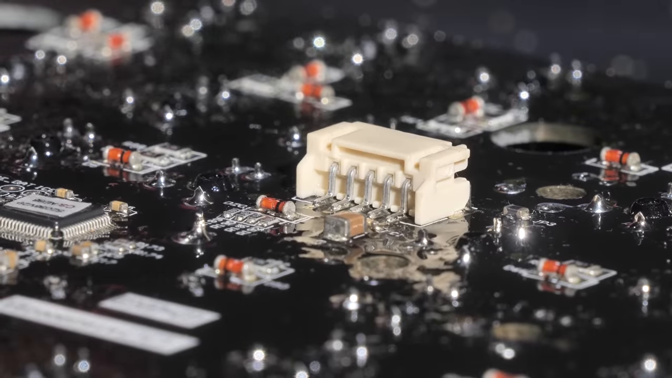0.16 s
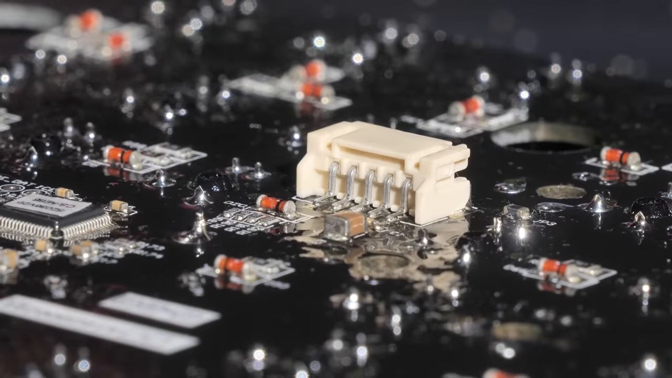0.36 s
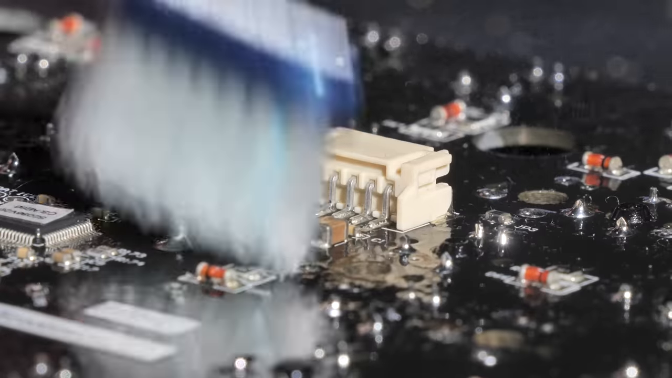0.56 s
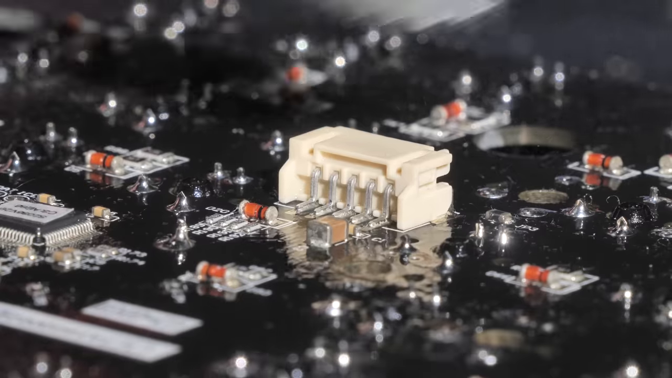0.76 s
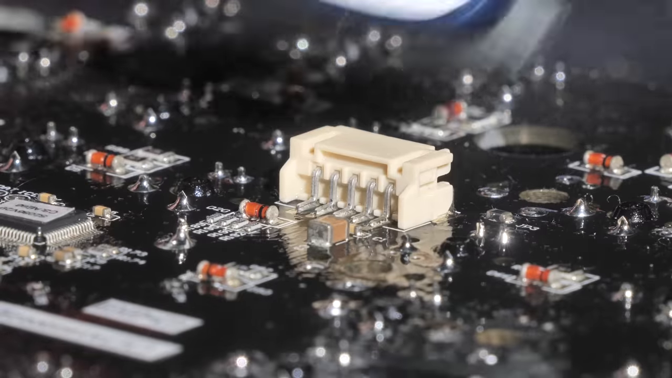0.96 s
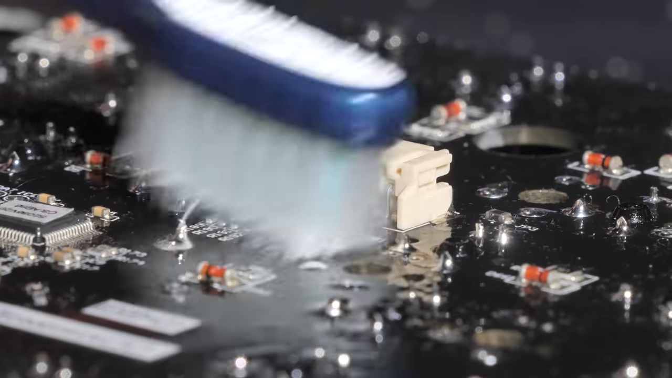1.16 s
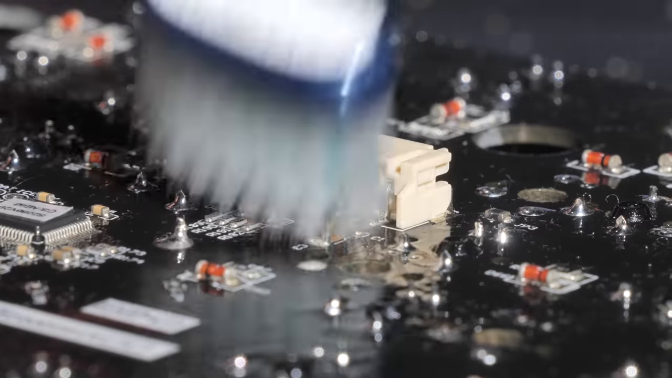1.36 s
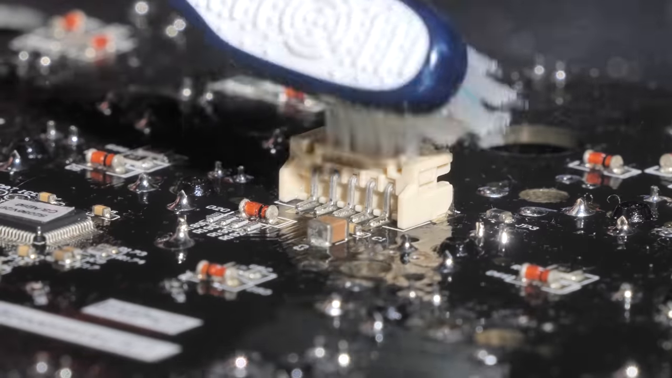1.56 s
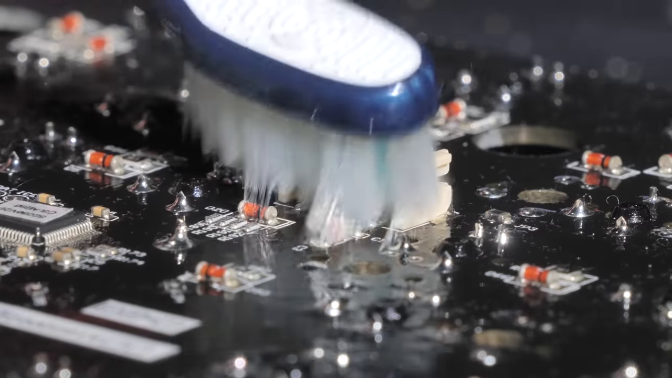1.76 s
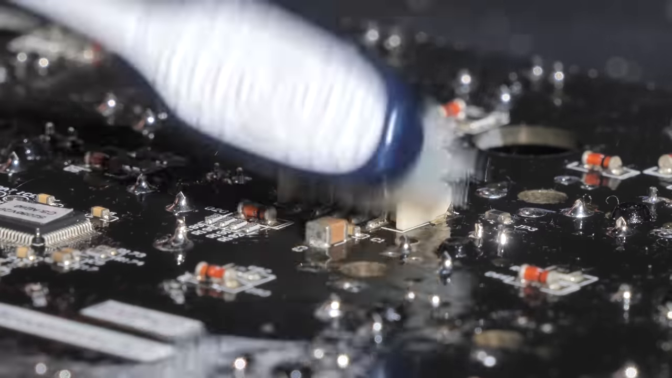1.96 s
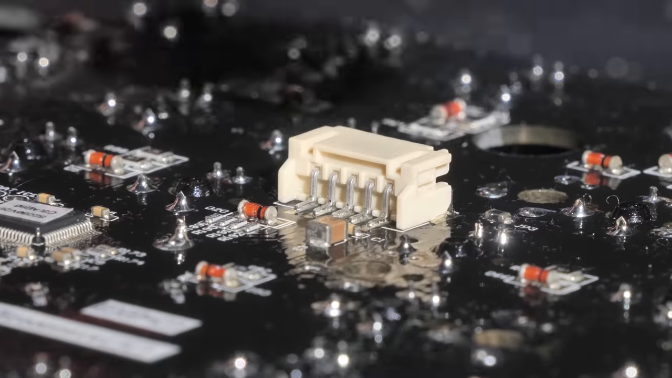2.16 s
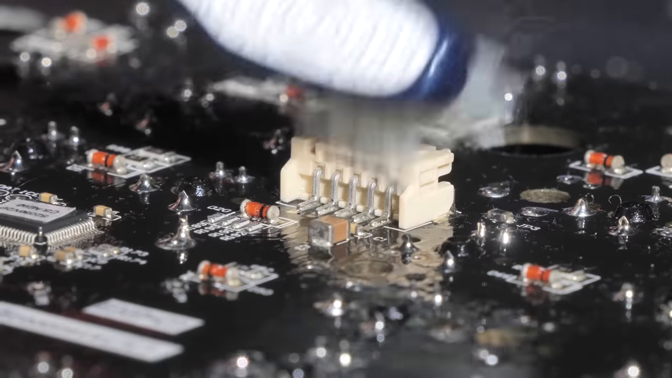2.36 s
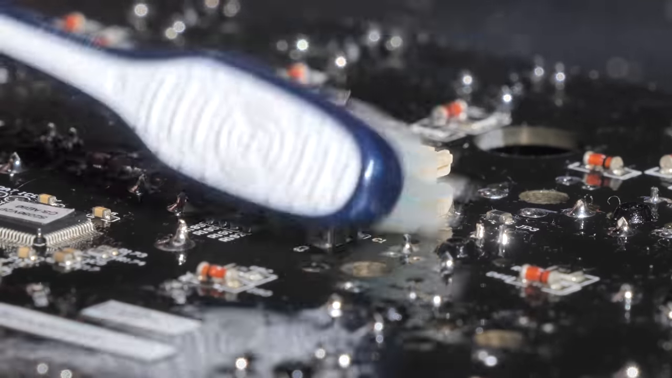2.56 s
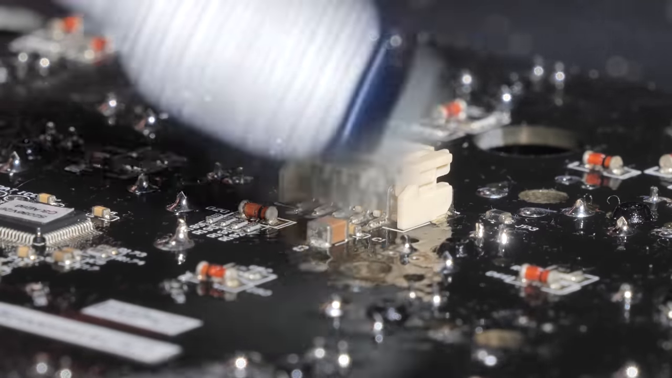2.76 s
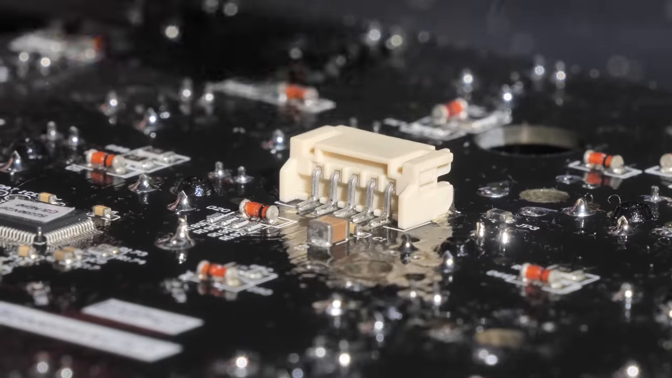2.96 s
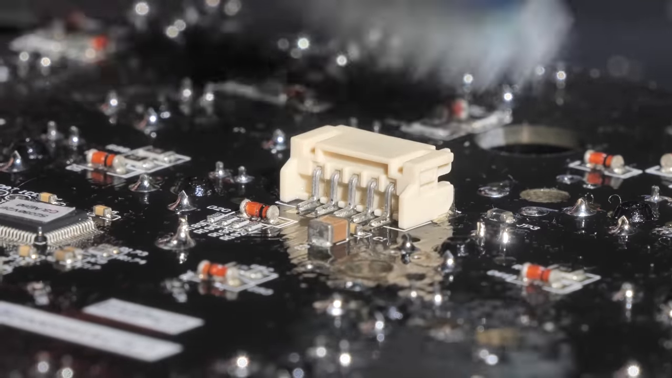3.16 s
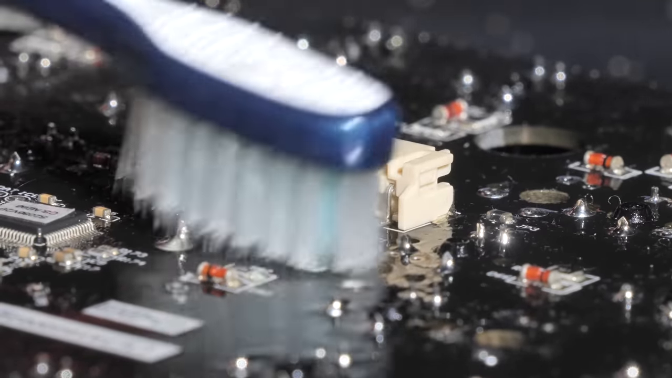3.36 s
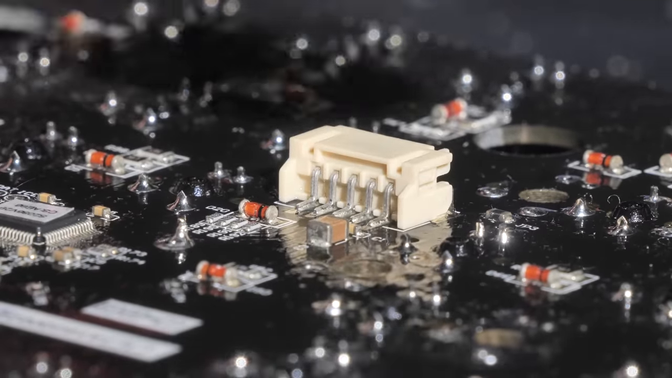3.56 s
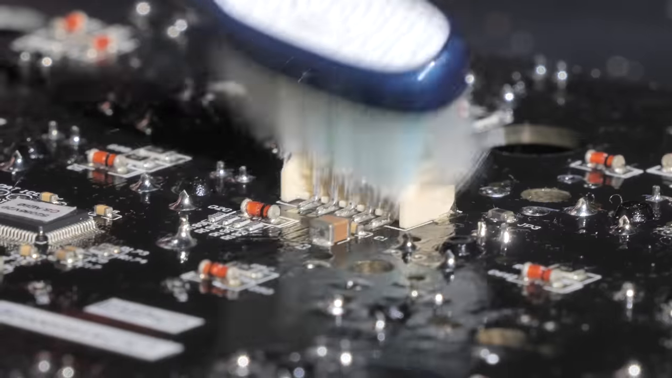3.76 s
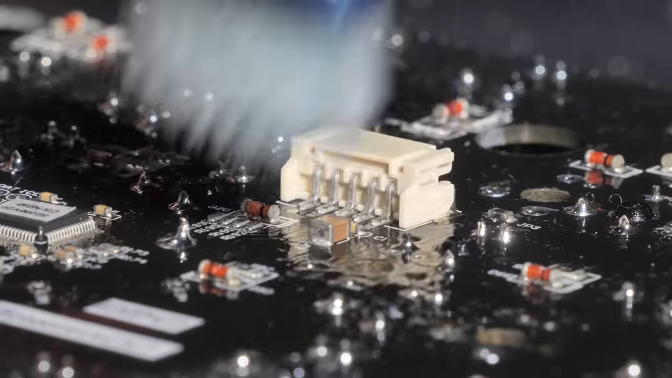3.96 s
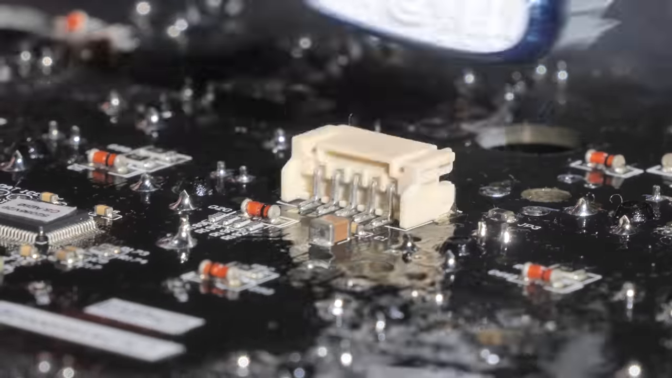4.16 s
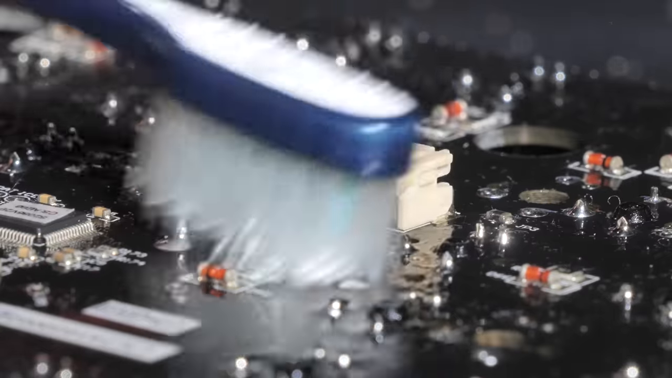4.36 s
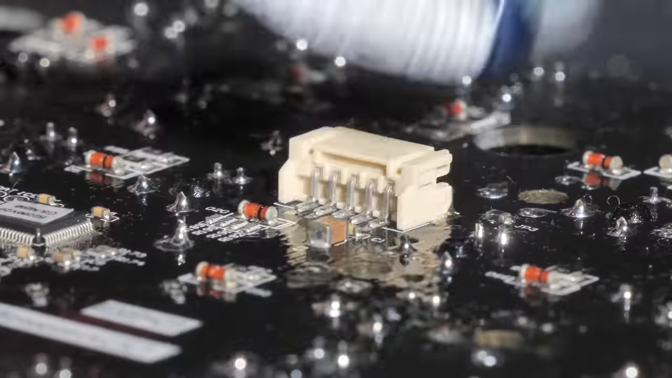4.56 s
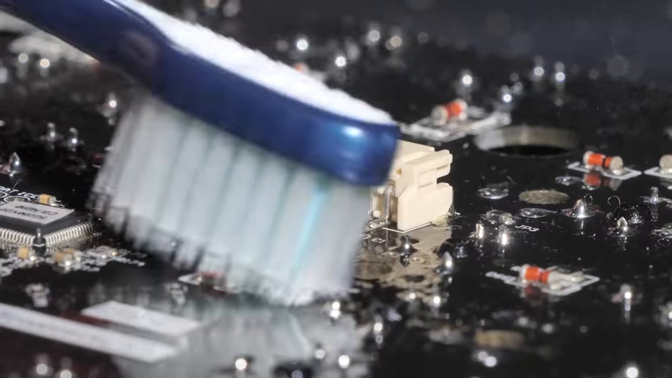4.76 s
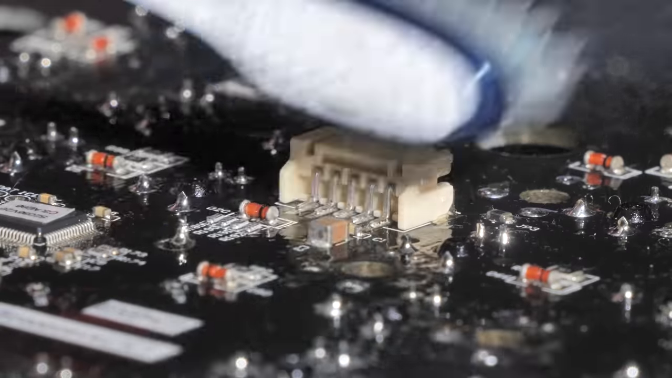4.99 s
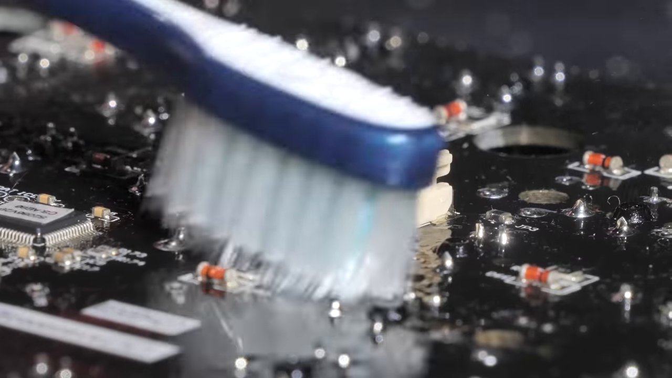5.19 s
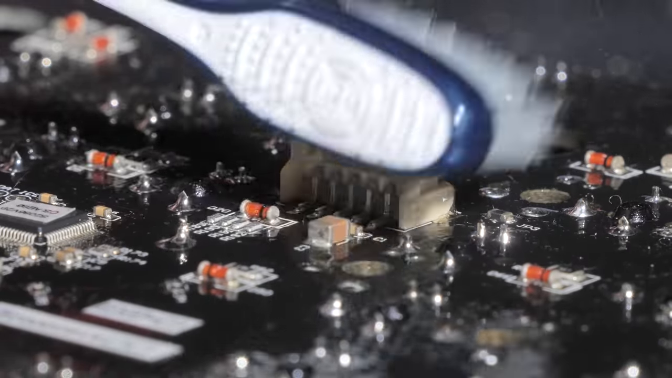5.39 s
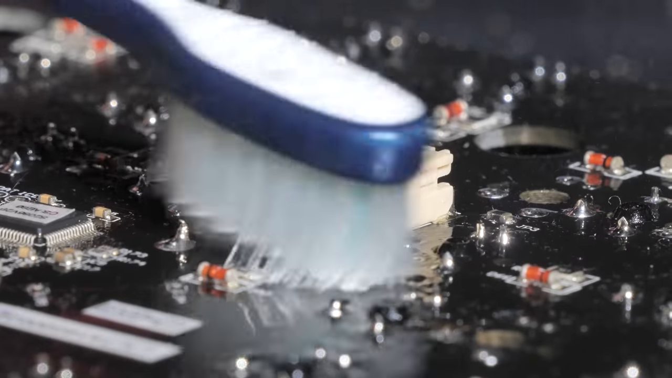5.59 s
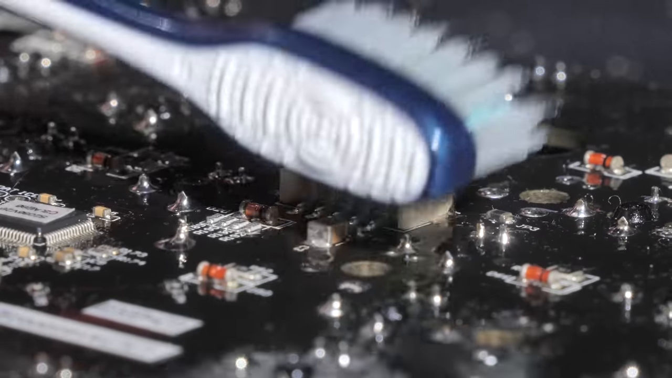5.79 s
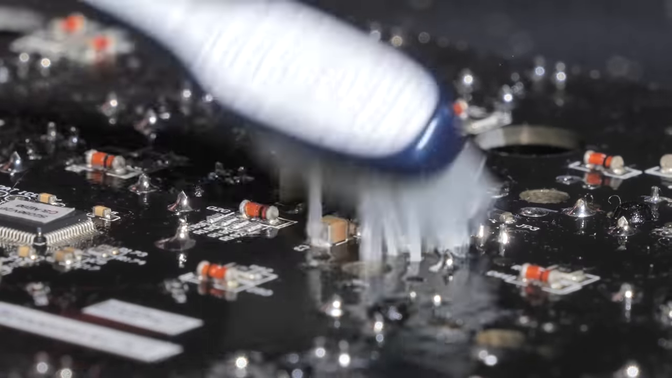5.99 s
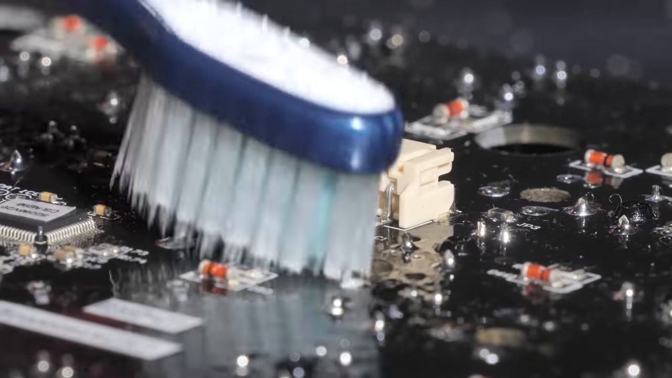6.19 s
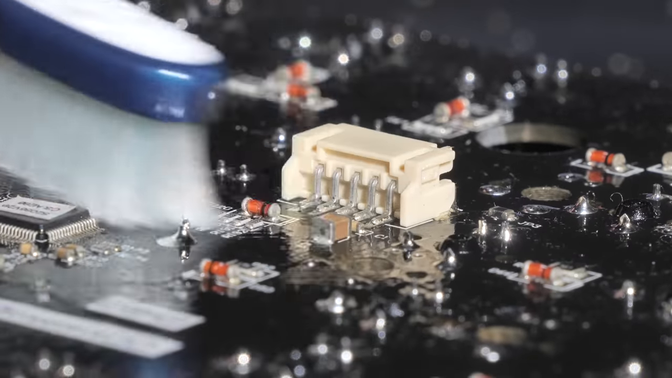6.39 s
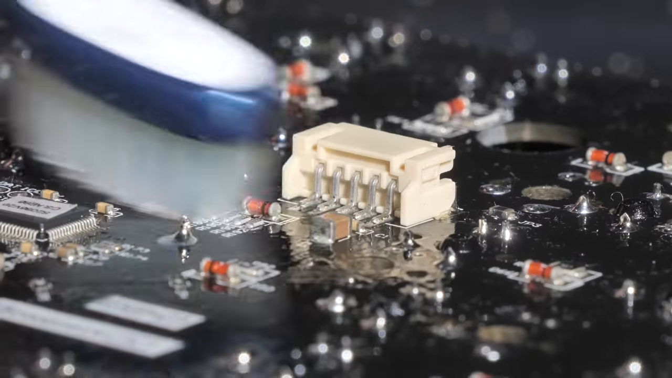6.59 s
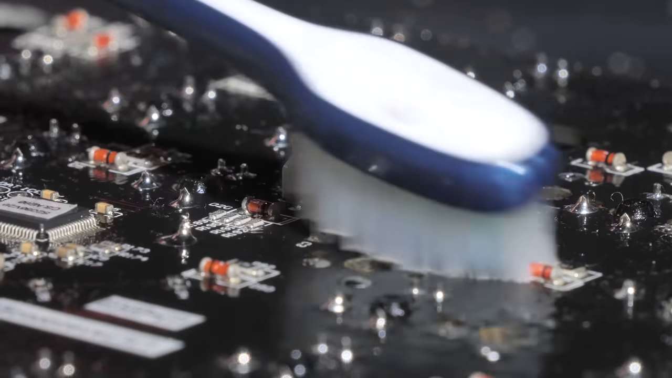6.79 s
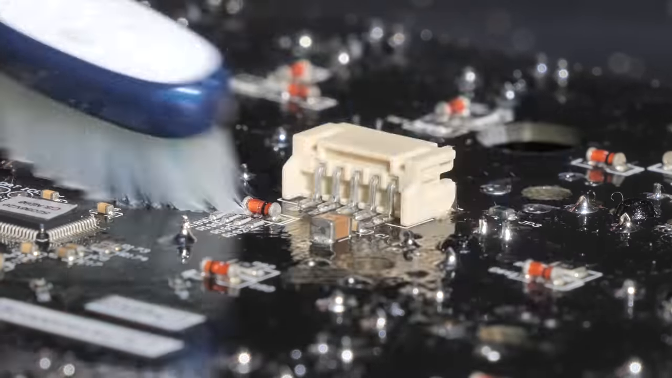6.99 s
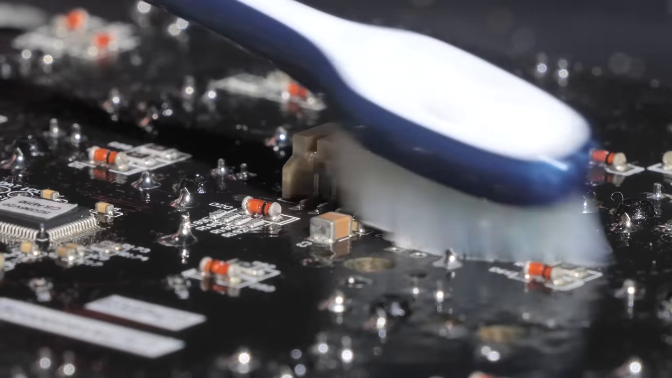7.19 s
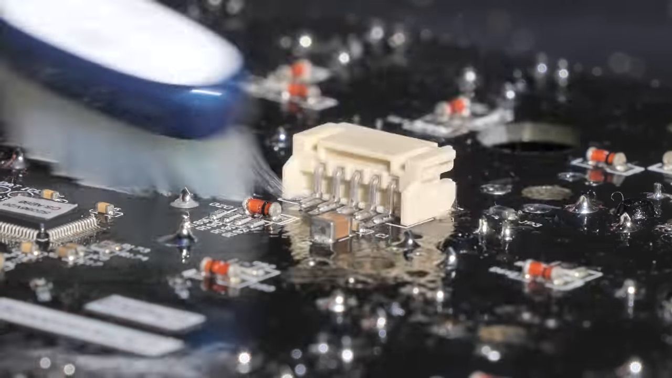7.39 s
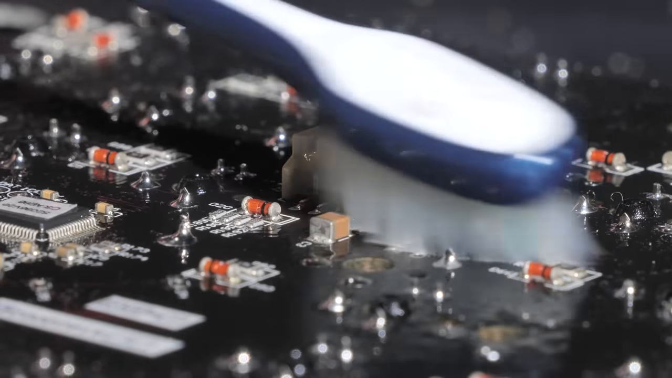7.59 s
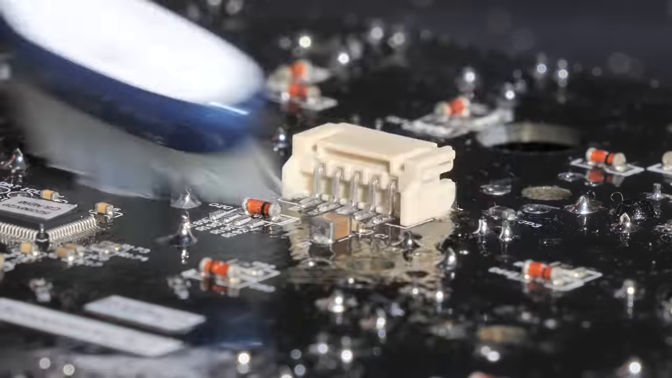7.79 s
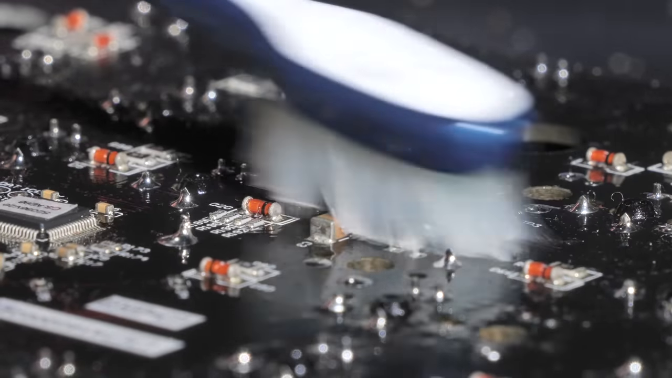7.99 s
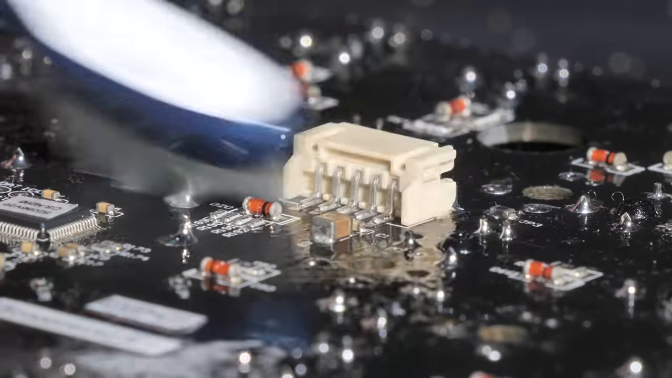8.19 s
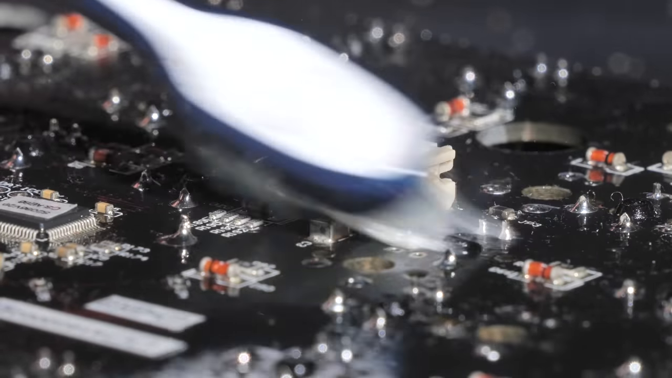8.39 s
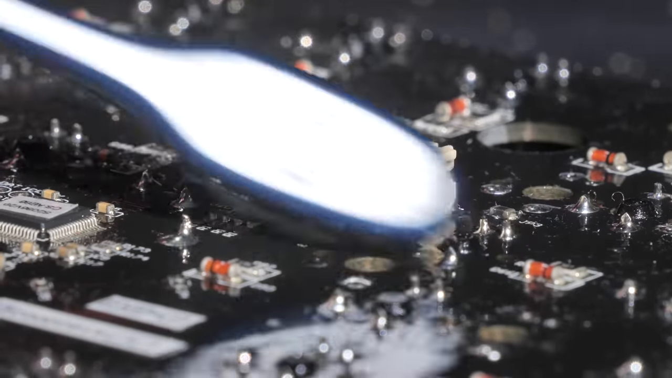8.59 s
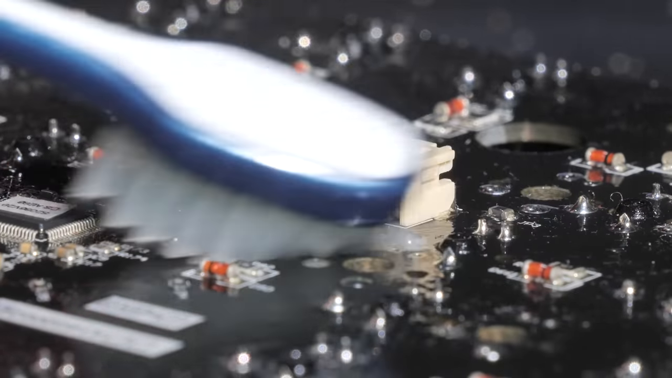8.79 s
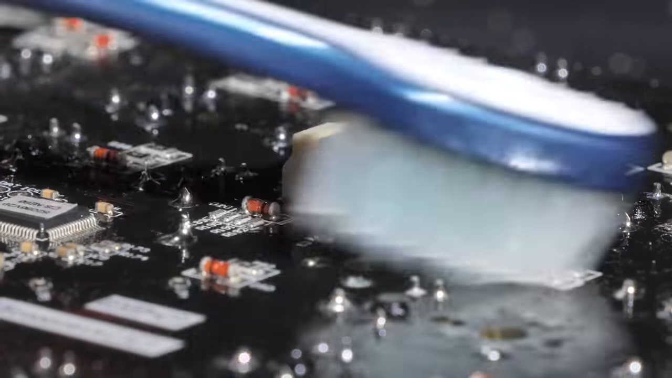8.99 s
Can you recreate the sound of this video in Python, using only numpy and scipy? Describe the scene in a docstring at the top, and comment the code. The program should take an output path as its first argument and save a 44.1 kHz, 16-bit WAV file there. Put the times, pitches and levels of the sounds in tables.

```python
"""A toothbrush cleans a wet circuit board close by, in a small, quiet room.
For six seconds it dabs: the tufts land, drag over solder pins and snap free, with dull bumps on the bench.
Countless bristle flicks hiss, ring the board and rumble its support; early on, the board rattles briefly.
Then the brush scrubs steadily to and fro, its finer hiss rising and falling with the hand's swing.
Near the end the board knocks sharply against its support and rattles, and the scrubbing eases off."""
import sys
import numpy as np
from scipy import signal
from scipy.fft import rfft, irfft
from scipy.io import wavfile

SR = 44100
rng = np.random.default_rng(int(sys.argv[2]) if len(sys.argv) > 2 else 0)


def master(y):
    """Save y as 16-bit WAV."""
    cut = np.clip(np.atleast_2d(y).T, -1, 1)
    pcm = np.round(cut * 32767)  # scale
    wavfile.write(sys.argv[1], SR, pcm.astype(np.int16))


N = 399105
T = np.arange(N) / SR
GRID_HZ = np.maximum(np.arange(4097) * SR / 8192, 1)


# EQ of bristles flicking off pins: freq_hz, gain_db
FLICK_EQ = [(150, -48.5), (600, -13.5), (1100, -13), (2100, -14), (2500, -10), (3700, -2.5), (4700, -8),
            (5300, -2), (5900, -13), (6400, -7), (7400, -1), (9000, -4), (11000, -2.5), (12600, -1.5),
            (14300, -9.5), (15500, -5.5)]
# Drags of the brush (a long dab is a push and a pull): start_s, end_s, halfway_hiss_db, swell_db,
# board_db, support_db, board_pitch_hz, support_pitch_hz, brightness_db_per_octave
BRUSH_DRAGS = [ (0, 0.137, -72, -12, -90, -90, 1600, 240, 0),
               (0.279, 0.375, -61.5, -17, -96, -59.5, 1790, 300, -8.5),
               (0.371, 0.504, -68.5, 16, -77, -70, 1630, 240, 0.5),
               (0.645, 0.759, -50.5, 16.5, -59.5, -57.5, 1370, 164, .5),
               (0.908, 1.037, -48.5, 23, -57.5, -56.5, 1600, 246, -.5),
               (1.204, 1.312, -46, 22, -53, -54, 1540, 209, -0.5),
               (1.45, 1.575, -48.5, 14.5, -58.5, -55, 1500, 352, -0.5),
               (1.571, 1.663, -44.5, -9, -64.5, -66, 1570, 165, 3),
               (1.751, 1.797, -58.5, 8, -65, -68, 1580, 150, -2),
               (1.792, 1.884, -44.5, 4, -55.5, -55.5, 1550, 360, -0.5),
               (2.07, 2.155, -38.5, -1, -61, -59.5, 1480, 140, 3),
               (2.325, 2.461, -43.5, 10.5, -56, -61, 1450, 372, 0),
               (2.626, 2.714, -39, 12.5, -58.5, -58, 1580, 163.5, 2),
               (2.86, 2.957, -44, 23.5, -57, -55.5, 1520, 178, 1.5),
               (3.146, 3.179, -59, 8, -67, -70, 1520, 172, -1),
               (3.175, 3.23, -41.5, 18.5, -60.5, -59.5, 1570, 169, 2.5),
               (3.408, 3.535, -46.5, 14.5, -56, -58, 1530, 183, 0.5),
               (3.741, 3.906, -42, 14.5, -54, -53.5, 1600, 169, 0.5),
               (4.087, 4.239, -42, 15, -56.5, -50, 1610, 170, -0.5),
               (4.398, 4.532, -45, 16, -55, -58.5, 1600, 263, -.5),
               (4.527, 4.632, -41.5, 14, -59.5, -61, 1510, 366, 1.5),
               (4.823, 4.978, -48, 14, -57.5, -60, 1650, 169, 0.5),
               (4.967, 5.084, -42, 11, -59.5, -57, 1570, 166, 1.5),
               (5.247, 5.38, -46, 7.5, -57, -58, 1610, 364, -0.5),
               (5.371, 5.506, -42.5, 4, -61, -60.5, 1530, 207, 2),
               (5.662, 5.812, -43.5, -2.5, -54.5, -52, 1600, 210, -1.5),
               (5.808, 5.892, -47, 6.5, -69.5, -69, 1590, 210, 2),
               (6.018, 6.048, -61, 16, -72, -63, 1550, 181, 5),
               (6.048, 6.203, -50.5, -22, -67, -69, 1540, 357, 1),
               (6.255, 6.309, -58.5, -8, -61.5, -68, 1630, 265, -6), ]

def dabbing(attack_s=0.0098, release_s=0.0049, board_share=0.86, board_sag_db=13, support_sag_db=8):
    """Bristles drag over pins and a connector: a coarse crackle that mostly swells as they bend."""
    force = bristle_slips(rate_hz=9000, scatter_db=1.5, tuft_rate_hz=380, tuft_db=3.5)
    force *= undb(1.43 * wander(90))
    out = np.zeros(N)
    for start, end, hiss_db, swell_db, board_db, support_db, *timbre in BRUSH_DRAGS:
        done = progress(start, end)
        touch = np.clip((end - start) * np.minimum(done / attack_s, (1 - done) / release_s), 0, 1)
        # board and support follow the swell, but sag as the brush slows
        slopes_db = swell_db, board_share * swell_db - board_sag_db, swell_db - support_sag_db
        envelopes = [touch * undb(mid_db + slope_db * (done - .5))
                     for mid_db, slope_db in zip((hiss_db, board_db, support_db), slopes_db)]
        out += stroke(force, start, envelopes, timbre, FLICK_EQ)
    return out


# EQ of bristles sliding on the wet board: freq_hz, gain_db
SLIDE_EQ = [(150, -29), (600, -16), (1100, -13), (2100, -26.5), (2500, -9.5), (3700, -4.5), (4700, -6),
            (5250, 0.5), (5800, -7), (6400, -5.5), (7400, 1), (9000, -2.5), (11000, -1), (12600, -3),
            (14200, -8), (15500, -6)]
# Scrub strokes, turn to turn, with levels at full speed: start_s, end_s, hiss_db, fastest_at_fraction,
# board_db, support_db, board_pitch_hz, support_pitch_hz, brightness_db_per_octave
SCRUB_STROKES = [ (6.299, 6.616, -47.5, 0.46, -50.5, -60.5, 1590, 277, -3.1),
                 (6.542, 6.853, -48, 0.66, -57, -60, 1540, 202, -1),
                 (6.857, 7.061, -38, 0.59, -44.5, -52, 1620, 247, -1.3),
                 (7.047, 7.26, -39.5, 0.54, -51, -51.5, 1590, 204, -1),
                 (7.261, 7.456, -34, 0.47, -47, -53, 1550, 253, -0.1),
                 (7.452, 7.653, -37.5, 0.56, -50.5, -49, 1540, 197, 0.2),
                 (7.652, 7.846, -33.5, 0.54, -46, -54, 1550, 261, 0.2),
                 (7.84, 8.036, -38, 0.52, -49.5, -53.5, 1570, 208, -0.2),
                 (8.031, 8.221, -33.5, 0.52, -43.5, -53, 1500, 274, 0),
                 (8.213, 8.403, -34.5, 0.66, -47.5, -46.5, 1540, 187, -0.2),
                 (8.402, 8.575, -33, 0.55, -47.5, -54.5, 1620, 248, 0),
                 (8.562, 8.791, -36.5, .52, -45.5, -50.5, 2000, 216, 0.2),
                 (8.781, 8.959, -43.5, 0.41, -50.5, -55, 1680, 234, -0.7),
                 (8.953, 9.062, -49, 0.37, -53, -65, 1790, 204, -0.5), ]

def scrubbing(glide=0.029, creep=0.12, speed_powers=(1.8, 1.68, 1.54)):
    """Bristles slide over the wet flat of the board: hiss, ring and rumble grow with the hand's speed."""
    force = bristle_slips(rate_hz=18000, scatter_db=5.5, tuft_rate_hz=490, tuft_db=2.0)
    out = np.zeros(N)
    for k, (start, end, hiss_db, fastest_at, board_db, support_db, *timbre) in enumerate(SCRUB_STROKES):
        swing = np.sin(np.interp(progress(start, end), [0, fastest_at, 1], [0, np.pi / 2, np.pi]))
        speed = creep + (1 - creep) * swing  # the brush still creeps at the turns
        envelopes = [undb(top_db) * speed ** power
                     for top_db, power in zip((hiss_db, board_db, support_db), speed_powers)]
        bend = glide if k % 2 else -glide  # the ring falls on a push, rises on a pull
        out += stroke(force, start, envelopes, timbre, SLIDE_EQ, bend, boost_db=9)
    return out


def bristle_slips(rate_hz, scatter_db, tuft_rate_hz, tuft_db):
    """Single bristles slip at random and bunch up as whole tufts catch and let go. Rms 1."""
    slips = (rng.random(N) < rate_hz / SR) * rng.choice([-1, 1], N)
    sizes = undb(scatter_db * np.clip(rng.standard_normal(N), -2, 2))
    bunching = undb(tuft_db * np.tanh(wander(tuft_rate_hz) / 2) * 2)
    force = slips * sizes * bunching
    return force / force.std()


# Hollow ring of the wet board flexing: pitch_hz, width_hz, level_db
BOARD_RING = [(850, 118, -14.5), (1265, 36, -5), (1456, 80, -2.5), (1639, 18, -1), (1725, 120, -3),
              (1923, 100, -3.5), (2297, 220, -6.5)]
# Low rumble of the board on its support: pitch_hz, width_hz, level_db
SUPPORT_RUMBLE = [(151, 33.6, -3.5), (186.6, 18.2, 2), (229.4, 18, -2.5), (302, 71, -5), (417.5, 48, -2),
                  (518, 22, -10)]

def stroke(force, start, envelopes, timbre, bristle_eq, glide=0, boost_db=7):
    """One contact: the same slips hiss in the bristles, ring the board and shake its support."""
    board_hz, support_hz, tilt_db = timbre
    tilted_eq = [(hz, db + tilt_db * np.log2(max(hz, 2000) / 8000)) for hz, db in bristle_eq]
    hiss = eq([(40, -84.5)] + tilted_eq)
    early_ring = resonator(BOARD_RING, board_hz * (1 - glide), boost_db, reach=0.14)
    late_ring = resonator(BOARD_RING, board_hz * (1 + glide), boost_db, reach=0.14)
    rumble = resonator(SUPPORT_RUMBLE, support_hz, boost_db=12.5, reach=0.14)
    slips = force[int(start * SR):][:len(envelopes[0])]
    on_bristles, on_board, on_support = (slips * envelope[:len(slips)] for envelope in envelopes)
    travel = np.sin(np.linspace(0, np.pi / 2, len(slips))) ** 2  # crossfades the ring as the brush moves
    out = np.zeros(N)
    for drive, response in [(on_bristles, hiss), (on_board * (1 - travel), early_ring),
                            (on_board * travel, late_ring), (on_support, rumble)]:
        add(out, start, signal.fftconvolve(drive, response))
    return out


# EQ of bristle tips hitting the board: freq_hz, gain_db
TIP_EQ = [(150, -28.5), (600, -21), (1500, -6.5), (2100, -11), (2600, 1), (4200, 0), (5300, 3),
          (6300, -2.5), (8000, 2), (11000, -2), (15700, -8)]
# Touchdowns of the brush: start_s, tick_db, ring_db, thud_db
TUFT_LANDINGS = [(.292, -48.5, -59, -49), (0.652, -50, -50, -54), (0.678, -41, -46, -46),
                 (.926, -46, -50, -44.5), (1.208, -42, -45, -47.5), (1.45, -43.5, -51, -57),
                 (2.031, -45.5, -70, -74), (2.047, -63, -66, -63), (2.07, -46, -66, -78),
                 (2.325, -43.5, -57, -73), (2.339, -45, -58, -54), (2.362, -61, -60, -46.5),
                 (2.595, -40, -54.5, -58), (2.599, -53, -54, -60), (3.127, -53, -78, -71),
                 (3.141, -44.5, -66, -60), (3.409, -40.5, -46.5, -42.5), (3.735, -40.5, -41, -49),
                 (4.08, -54, -48, -51), (4.087, -48, -44, -52), (4.398, -40, -45, -45.5),
                 (4.825, -41, -47, -52), (4.836, -47, -47.5, -58), (5.21, -46.5, -53, -50.5),
                 (5.636, -41.5, -49, -48.5), (5.996, -40.5, -45, -59), (6.036, -48, -64, -58),
                 (6.061, -35, -46.5, -49), (6.084, -35.5, -55, -59), (6.256, -48, -47.5, -58)]

def landing(lead_s=0.00056, gap_s=0.0073, hit_s=0.0046, settle_s=0.035, thud_s=0.029):
    """Four tufts hit in quick succession, each softer: ticks and a hollow ring over one soft thud."""
    tips, board, support = np.zeros((3, N))
    t = T[:SR // 10]
    for start, tick_db, ring_db, thud_db in TUFT_LANDINGS:
        gaps = gap_s * (rng.random(4) + .5)
        for k, delay in enumerate(np.cumsum(gaps) - gaps[0]):
            hit = flurry(np.exp(-t / hit_s)) * undb(-6 * np.sqrt(k))
            add(tips, start - lead_s + delay, undb(tick_db - 1.5) * hit)
            add(board, start - lead_s + delay, undb(ring_db + 1) * hit)
        rustle = rng.standard_normal(len(t)) * np.exp(-t / settle_s)  # the landed bristles spread
        add(tips, start, undb(tick_db - 23.5) * rustle)
        add(support, start, undb(thud_db + 5) * flurry(np.exp(-t / thud_s)))
    ticks = through(tips, eq(TIP_EQ))
    ring = through(board, resonator(BOARD_RING, pitch_hz=1590))
    thuds = through(support, resonator(SUPPORT_RUMBLE, pitch_hz=175))
    return ticks + ring + thuds


# EQ of a tuft springing free: freq_hz, gain_db
SNAP_EQ = [(150, -41.5), (600, -17.5), (1500, -8), (2300, -18), (3700, -6.5), (6200, -12), (7400, -3.5),
           (10000, -5.5), (12600, 5.5), (14000, -7.5), (15700, -1)]
# Tufts snapping off an edge: peak_s, level_db
TUFT_SNAPS = [(1.028, -32), (1.29, -33), (1.306, -33), (1.559, -33.5), (1.876, -31.5), (2.141, -23.5),
              (2.146, -29), (2.453, -35), (2.692, -30), (2.708, -27.5), (2.951, -45), (3.84, -35.5),
              (3.891, -25.5), (3.898, -25.5), (4.17, -36), (4.205, -38), (4.222, -24.5), (4.228, -44.5),
              (4.519, -37), (4.628, -32), (4.966, -37), (5.054, -32.5), (5.36, -38), (5.736, -35.5),
              (5.794, -41)]

def snapping(attack_s=0.0038, release_s=0.00085, lead_s=0.01):
    """A bent tuft springs free: dense, bright flicks build for a few milliseconds and stop."""
    force = np.zeros(N)
    t = T[:SR // 50] - lead_s
    swell = np.exp(-(t / np.where(t < 0, attack_s, release_s)) ** 2)
    for peak_s, level_db in TUFT_SNAPS:
        add(force, peak_s - lead_s, undb(level_db + 1.5) * flurry(swell))
    return through(force, eq(SNAP_EQ))


def flurry(envelope):
    """Many bristles at once: a noise burst holding the energy of 3 ms at level 1."""
    return unit(rng.standard_normal(len(envelope)) * envelope) * np.sqrt(3 * SR / 1000)


def pinging(rate_hz=130, centre_hz=5200, spread_octaves=0.6, decay_s=0.00054):
    """During the drags, stiff bristles pluck pins: tiny ticks, each with its own pitch."""
    out, t = np.zeros(N), T[:SR // 100]
    for start, end, hiss_db, swell_db, *_ in BRUSH_DRAGS:
        count = int(rate_hz * (end - start))
        for place, pitch, strength in rng.random((count, 3)):
            pitch_hz = centre_hz * 2 ** (spread_octaves * (pitch - .5))
            tick = np.sin(2 * np.pi * pitch_hz * t) * np.exp(-t / decay_s)
            level_db = hiss_db + swell_db * (place - .5) + 10 * strength - 2
            add(out, start + place * (end - start), undb(level_db) * tick)
    return out


# The board ticking against its support: start_s, level_db, pitch_hz, t60_s, relative_crack_db
BOARD_KNOCKS = [(1.3337, -43, 1320, .014, -4), (1.341, -43.5, 1110, 0.022, 7), (1.344, -51, 1240, 0.02, -1),
                (1.35, -37, 1250, 0.027, 1.5), (1.358, -42, 1090, 0.022, -6),
                (1.366, -42.5, 1260, 0.021, -3), (1.373, -42, 1230, .016, -11),
                (8.6903, -16, 1740, 0.0066, -9.5), (8.698, -35, 910, 0.018, 7),
                (8.7032, -36, 1180, 0.013, 8), (8.7062, -39, 1300, .016, 9), (8.708, -35, 387, 0.033, -8),
                (8.714, -34, 1240, 0.014, 9), (8.7145, -33, 1700, 0.013, -5), (8.719, -29, 1770, 0.017, -7),
                (8.7228, -30.5, 1630, 0.017, -2), (8.7345, -25.5, 2330, .01, -15),
                (8.7763, -30, 3000, 0.019, 8.5), (8.7775, -28.5, 596, 0.012, -31)]

def knocking(crack_s=0.002, crack_gain=0.63):
    """The board rocks: short hollow ticks, each with a crack that is brighter the higher its pitch."""
    out, t = np.zeros(N), T[:SR // 10]
    crack_shape = [(.2, -8), (1, -1), (2.2, 0), (2.9, -6), (4, -20), (10, -34)]  # pitch_ratio, gain_db
    for start, level_db, pitch_hz, t60_s, crack_db in BOARD_KNOCKS:
        tone = np.sin(2 * np.pi * pitch_hz * t) * np.exp(-np.log(1000) * t / t60_s)
        burst = rng.standard_normal(len(t)) * np.exp(-t / crack_s)
        crack = through(burst, eq([(pitch_hz * ratio, db) for ratio, db in crack_shape]))
        add(out, start, undb(level_db) * (tone + crack_gain * undb(crack_db) * crack))
    return out


# Boomy body of the bench: pitch_hz, width_hz, level_db
BENCH_MODES = [(45, 14, 5.5), (85.5, 36, 5.5), (200, 70, -32), (313, 100, 4), (430, 78, -5),
               (1150, 320, -15)]
# Dull bumps on the bench: start_s, peak_db, push_s
BENCH_BUMPS = [(0.2941, -29.5, 0.0014), (0.307, -35, 0.0013), (.68, -41, 0.012), (2.719, -48, 0.008),
               (3.415, -49, 0.0045), (3.9, -51, 0.0047), (4.599, -49, .006), (4.86, -65, 0.0069),
               (5.67, -53, 0.0087)]

def bumping():
    """Pushes set the bench's damped modes ringing: the longer the push, the deeper the thud."""
    out, t = np.zeros(N), T[:8192]
    bench = sum(undb(db) * width * np.exp(-np.pi * width * t) * np.cos(2 * np.pi * hz * t)
                for hz, width, db in BENCH_MODES)
    for start, peak_db, push_s in BENCH_BUMPS:
        thud = through(bench, np.hanning(int(push_s * SR)))
        add(out, start, undb(peak_db) * thud / np.abs(thud).max())
    return out


def room_reverb(sound, predelay_s=0.002):
    """Bass lingers; the treble has quick reflections off the bench and a very faint tail."""
    def tail(level_db, t60_s, curve):
        """Decaying noise through an EQ curve."""
        t = T[:SR]
        decay = rng.standard_normal(SR) * np.exp(-np.log(1000) * t / t60_s) * (t > predelay_s)
        return undb(level_db) * through(unit(decay), eq(curve))
    bass = tail(-26, .4, [(60, 0), (400, 0), (900, -12), (2500, -32), (8000, -50)])
    near = tail(-18, .06, [(200, 0), (7000, 0), (16000, -4)])
    far = tail(-31, .42, [(200, 3), (2000, 2), (9000, 0), (12500, -7), (16000, -7)])
    return through(sound, bass + near + far)


# EQ of the quiet room's air: freq_hz, gain_db
ROOM_TONE_EQ = [(25, -8), (45, -1.5), (85, -2), (130, -1.5), (240, -3.5), (350, -4.5), (520, -14),
                (730, -11.5), (1000, -18.5), (3000, -28.5), (8000, -32.5), (16000, -29.5)]

def room_tone(level_db=-68, waver_db=1.8):
    """A low, gently wavering bed of noise."""
    waver = undb(waver_db * wander(5))
    return through(rng.standard_normal(N), eq(ROOM_TONE_EQ)) * undb(level_db) * waver


def resonator(modes, pitch_hz, boost_db=5, reach=.13):
    """Impulse response of a body's modes; the place of contact favours those near one pitch."""
    power = 0
    for hz, width, db in modes:
        favour_db = boost_db * np.exp(-(np.log(hz / pitch_hz) / reach) ** 2)
        peak = undb(db + favour_db) / (1 + ((GRID_HZ - hz) / width) ** 2)
        power += peak ** 2
    return minimum_phase(np.sqrt(power))


def eq(curve):
    """Impulse response of an EQ curve of (freq_hz, gain_db) points."""
    hz, db = np.transpose(curve)
    return minimum_phase(undb(np.interp(np.log(GRID_HZ), np.log(hz), db)))


def minimum_phase(gain):
    """The tightest causal response with this spectral shape on GRID_HZ, at energy 1."""
    cepstrum = irfft(np.log(gain))
    middle = len(gain) - 1
    cepstrum[1:middle] *= 2
    cepstrum[middle + 1:] = 0
    return unit(irfft(np.exp(rfft(cepstrum))))


def wander(rate_hz):
    """Random modulation with spread 1, heading for a new value rate_hz times a second."""
    drift = np.interp(T * rate_hz, np.arange(N), rng.standard_normal(N))
    return drift / drift.std()


def progress(start, end):
    """Ramp from 0 to 1 over a stroke."""
    return np.linspace(0, 1, int((end - start) * SR))


def undb(db):
    """Decibels to gain."""
    return 10 ** (np.asarray(db) / 20)


def unit(sound):
    """Scale to energy 1."""
    return sound / np.sqrt(np.sum(sound ** 2))


def through(sound, response):
    """Play a sound through an impulse response."""
    return signal.fftconvolve(sound, response)[:len(sound)]


def add(out, start_s, sound):
    """Mix a sound in at start_s."""
    start = int(start_s * SR)
    out[start:start + len(sound)] += sound[:max(N - start, 0)]


def scene():
    """Brush, board and room, alike in both channels."""
    cleaning = dabbing() + pinging() + scrubbing() + snapping() + landing() + knocking() + bumping()
    mono = cleaning + room_reverb(cleaning) + room_tone()
    return np.array([mono, mono])


def record(dry):
    """A steep low-pass takes off the very top."""
    cutoff_hz = 15850
    return signal.sosfilt(signal.ellip(10, .2, 70, cutoff_hz, fs=SR, output="sos"), dry)


dry = scene()
out = record(dry)
master(out)
```